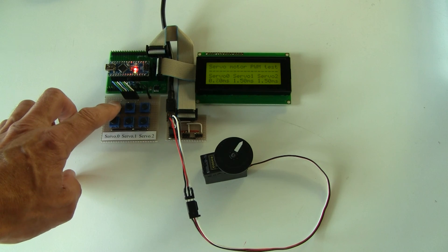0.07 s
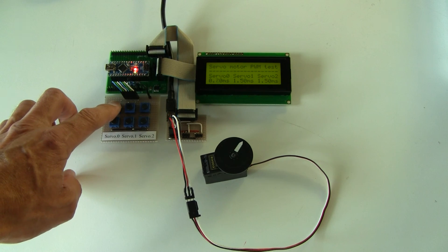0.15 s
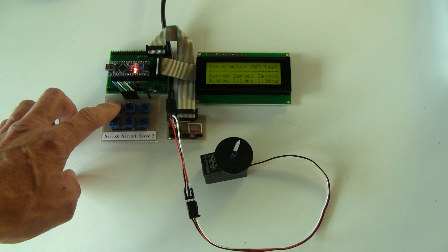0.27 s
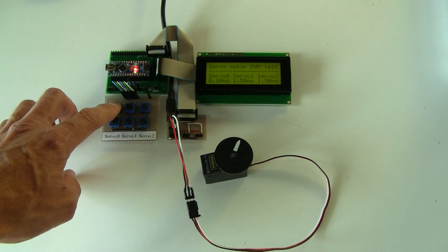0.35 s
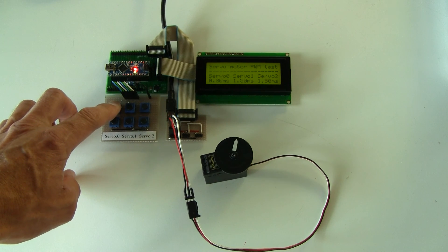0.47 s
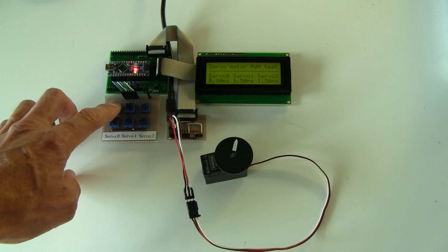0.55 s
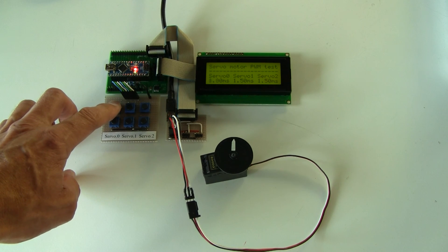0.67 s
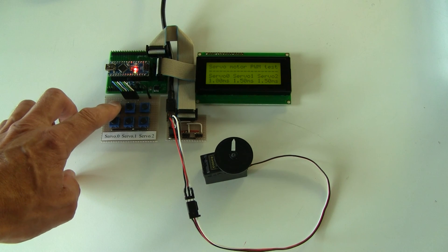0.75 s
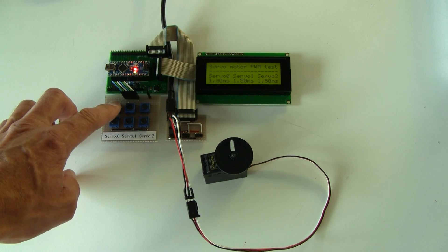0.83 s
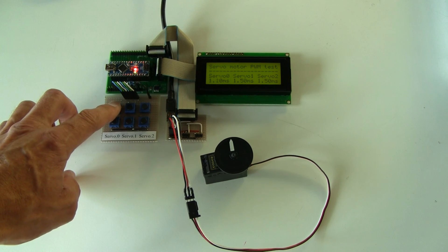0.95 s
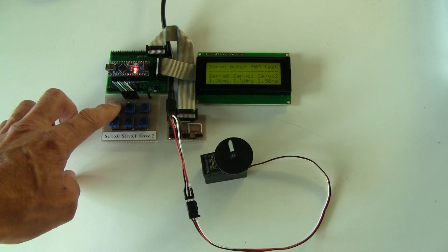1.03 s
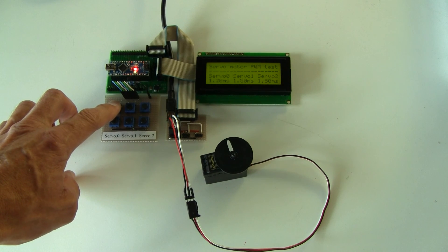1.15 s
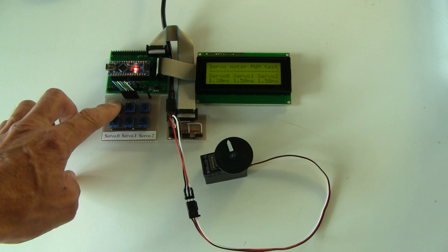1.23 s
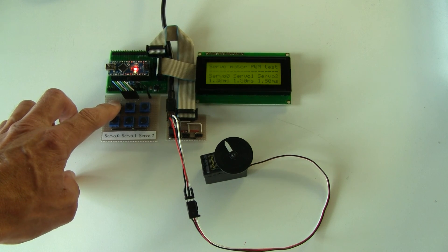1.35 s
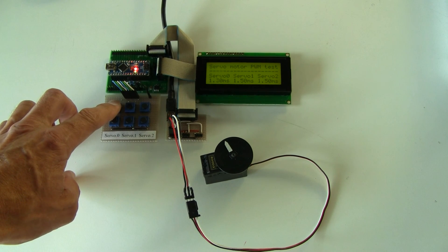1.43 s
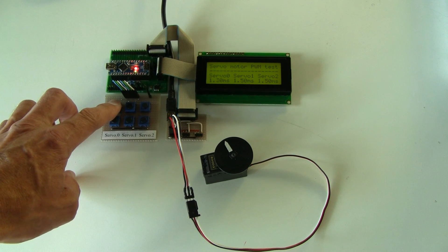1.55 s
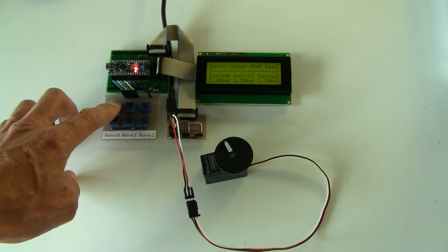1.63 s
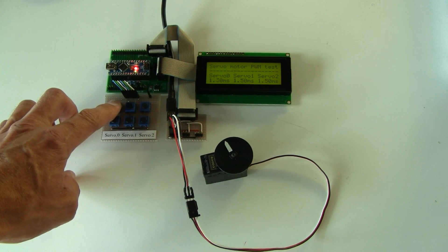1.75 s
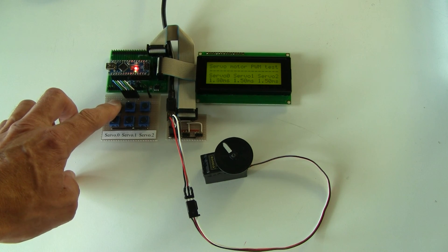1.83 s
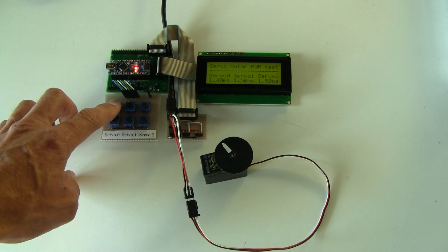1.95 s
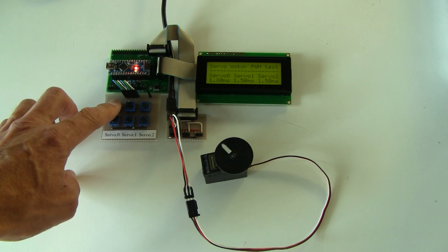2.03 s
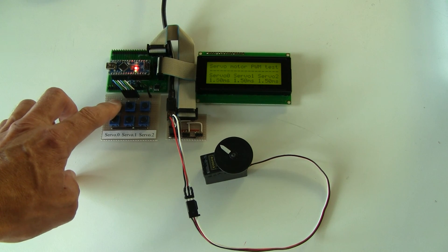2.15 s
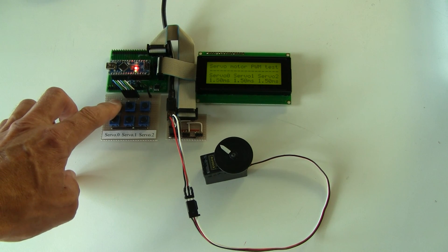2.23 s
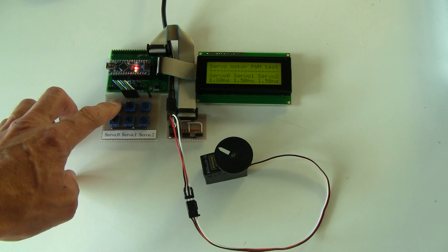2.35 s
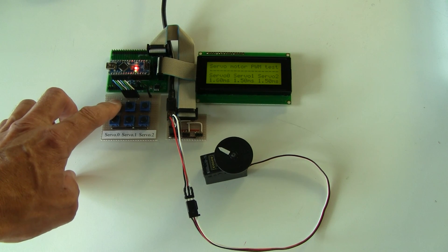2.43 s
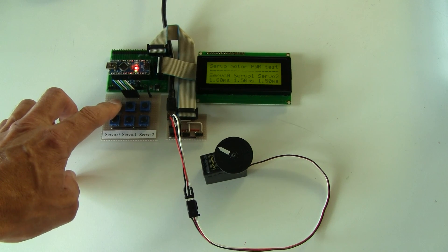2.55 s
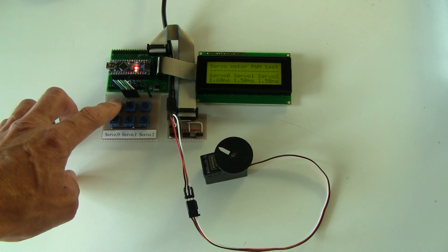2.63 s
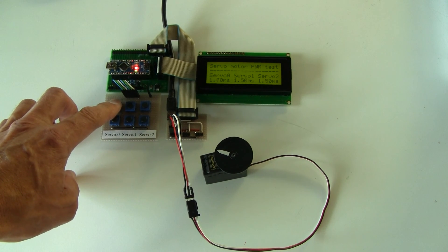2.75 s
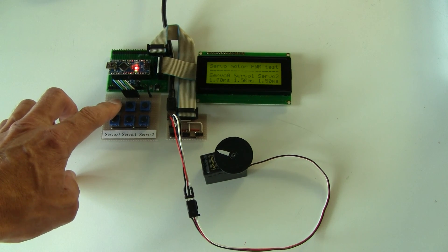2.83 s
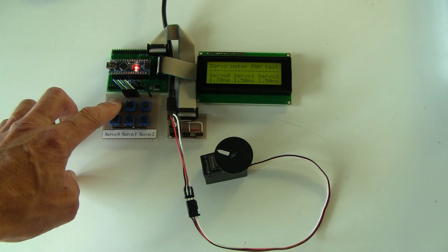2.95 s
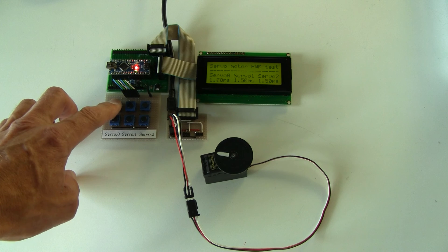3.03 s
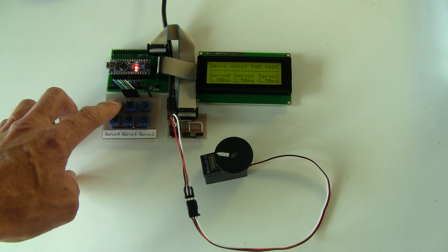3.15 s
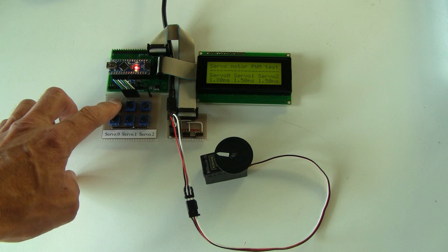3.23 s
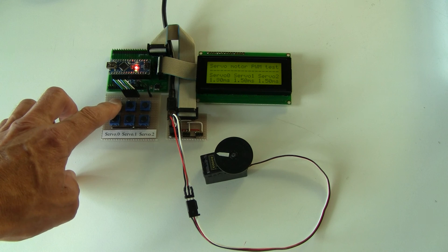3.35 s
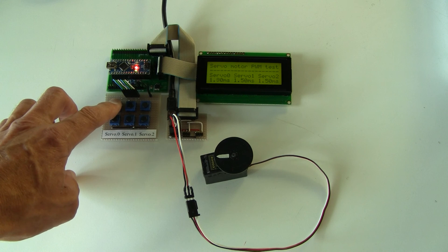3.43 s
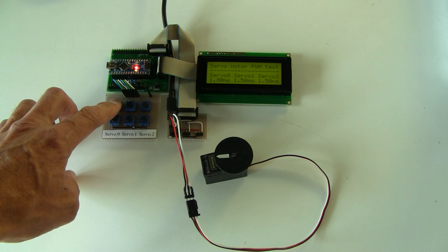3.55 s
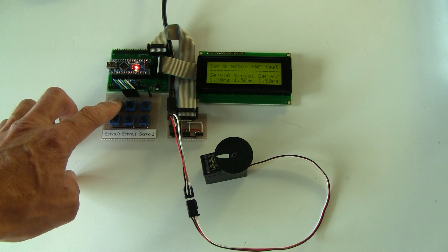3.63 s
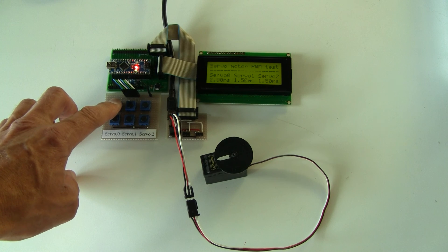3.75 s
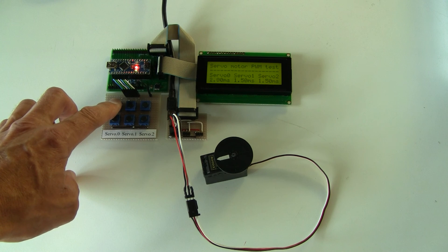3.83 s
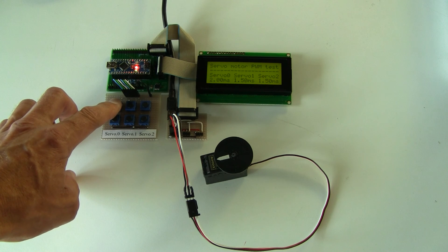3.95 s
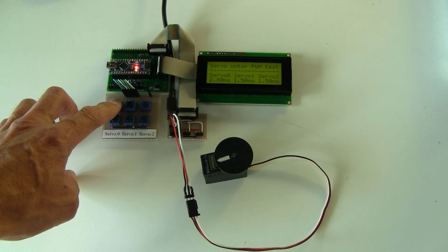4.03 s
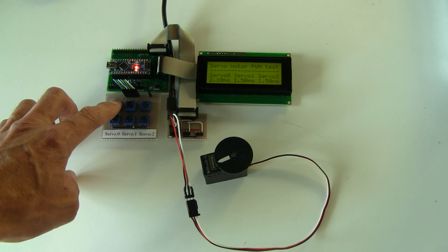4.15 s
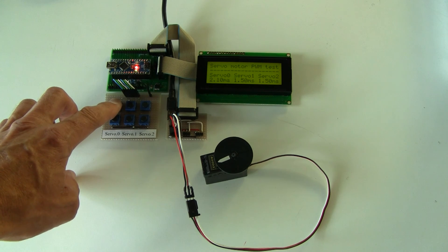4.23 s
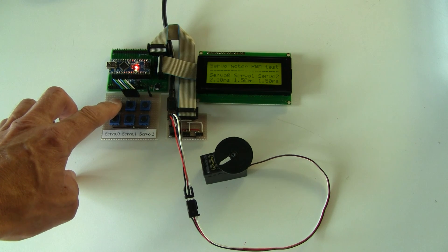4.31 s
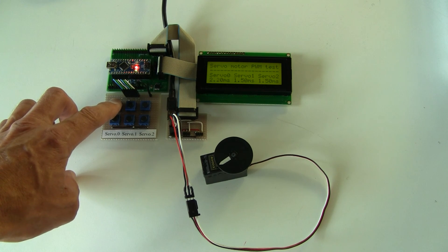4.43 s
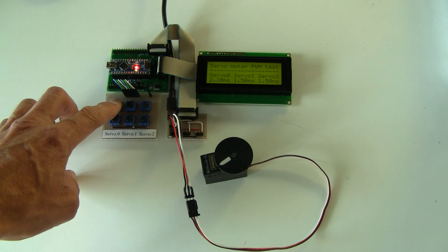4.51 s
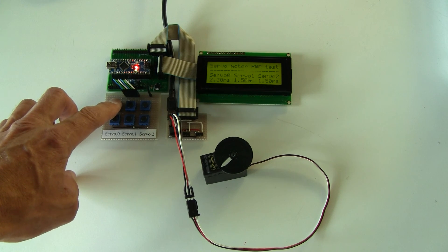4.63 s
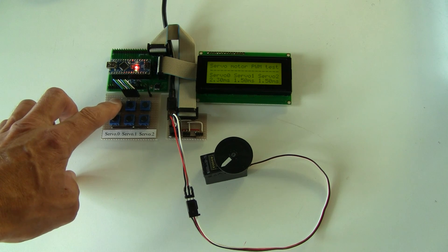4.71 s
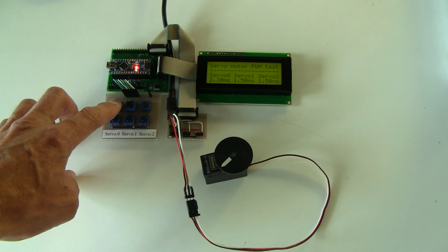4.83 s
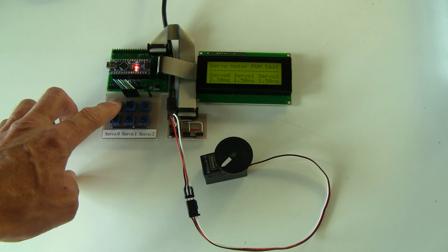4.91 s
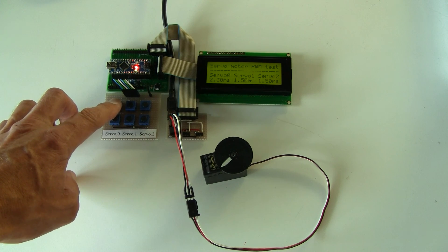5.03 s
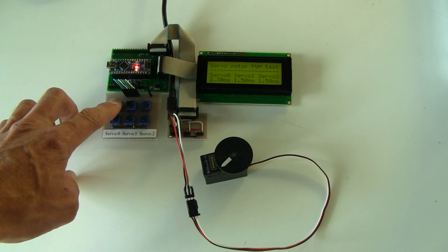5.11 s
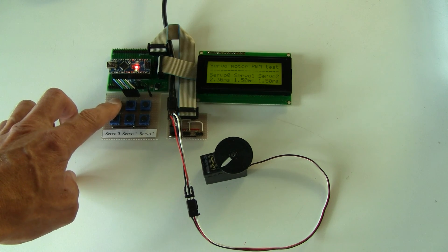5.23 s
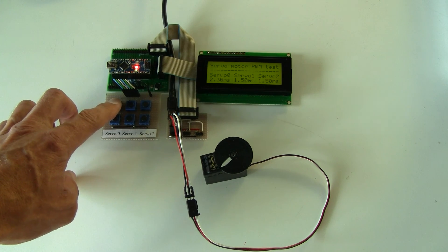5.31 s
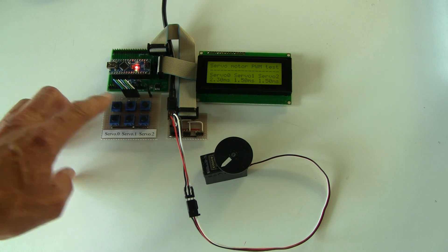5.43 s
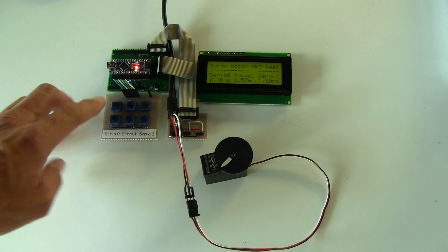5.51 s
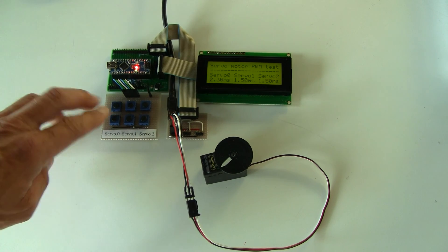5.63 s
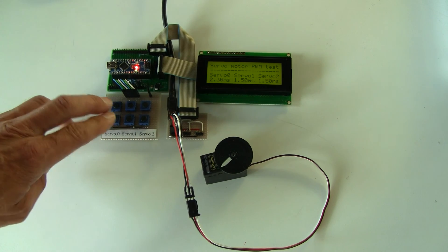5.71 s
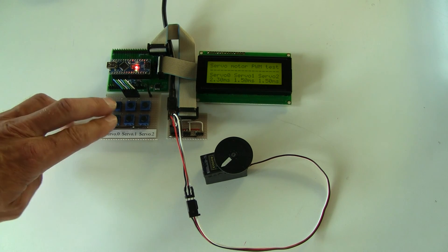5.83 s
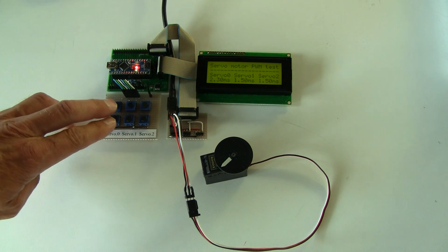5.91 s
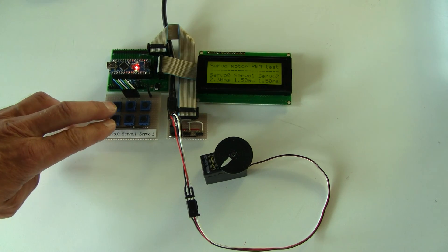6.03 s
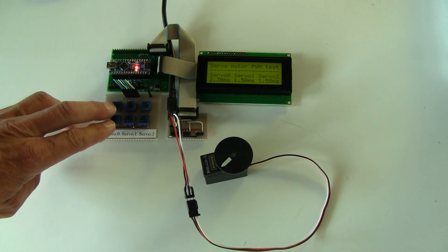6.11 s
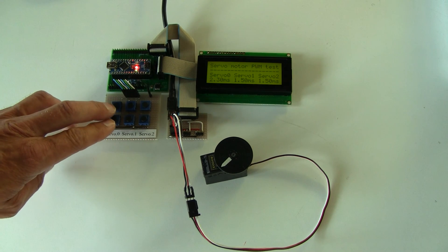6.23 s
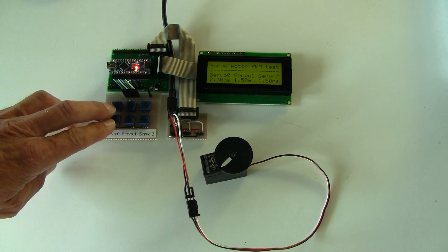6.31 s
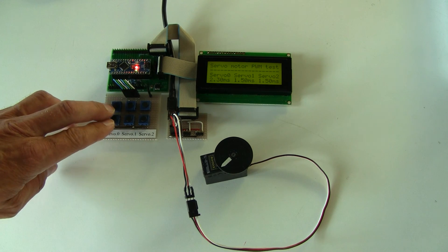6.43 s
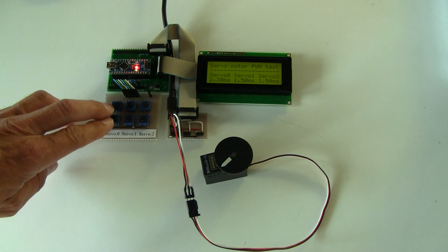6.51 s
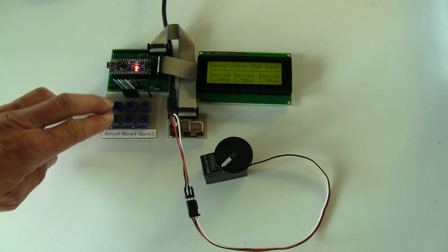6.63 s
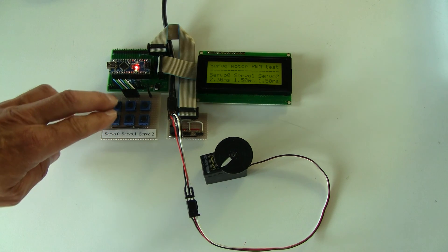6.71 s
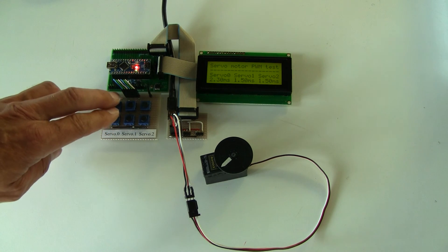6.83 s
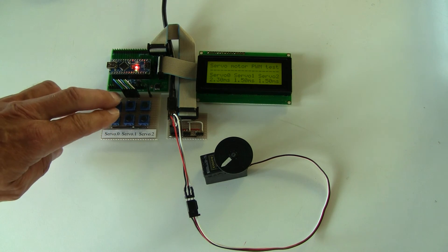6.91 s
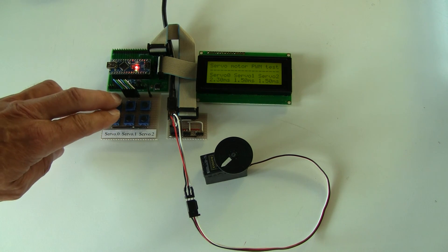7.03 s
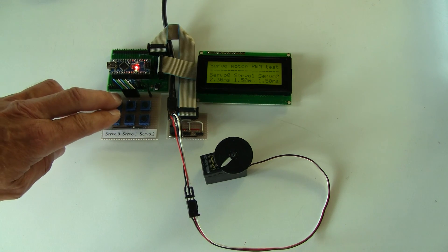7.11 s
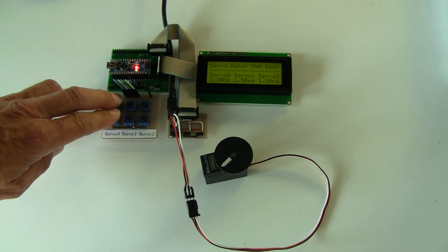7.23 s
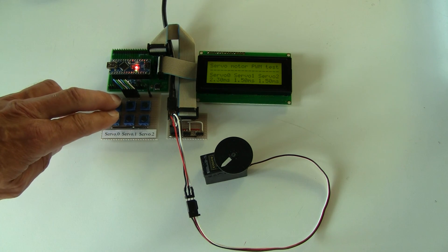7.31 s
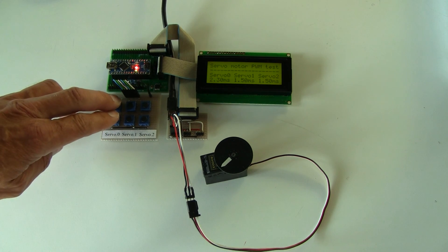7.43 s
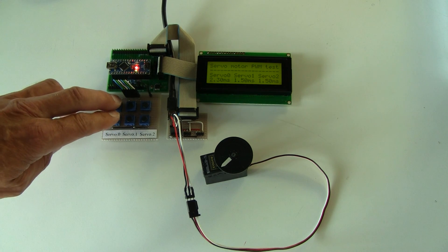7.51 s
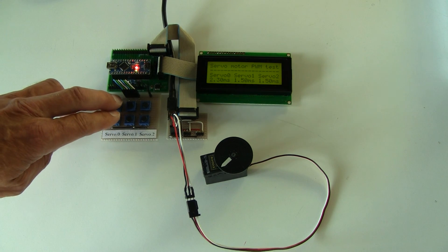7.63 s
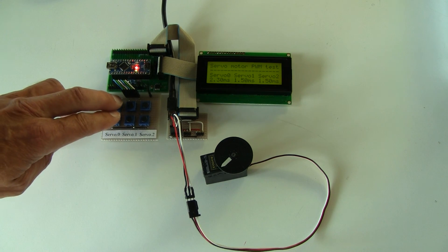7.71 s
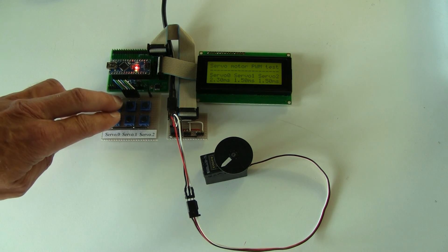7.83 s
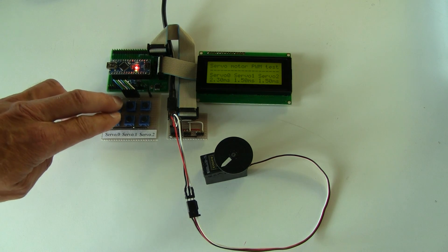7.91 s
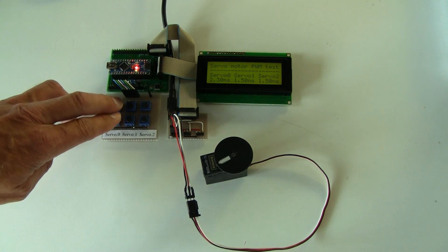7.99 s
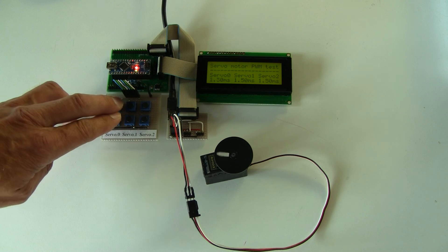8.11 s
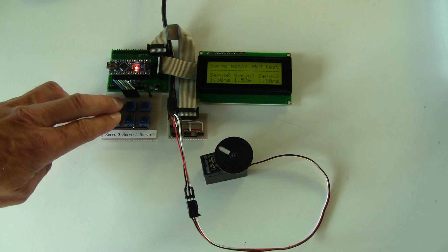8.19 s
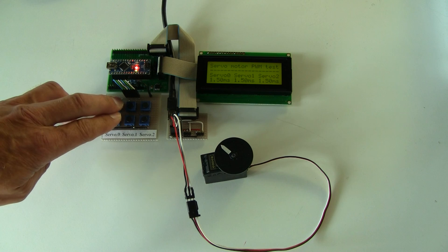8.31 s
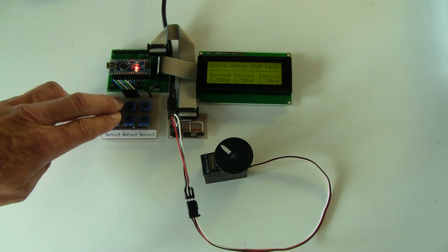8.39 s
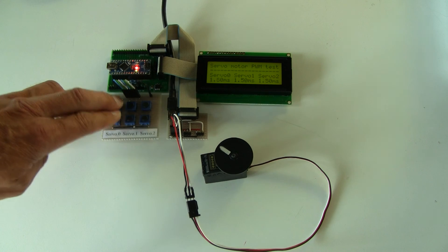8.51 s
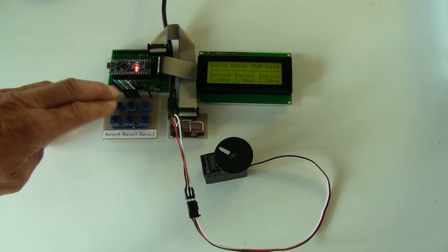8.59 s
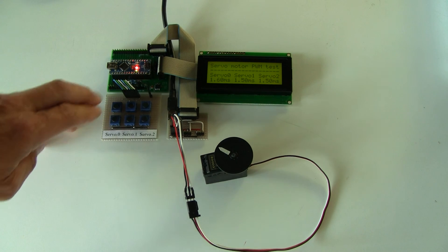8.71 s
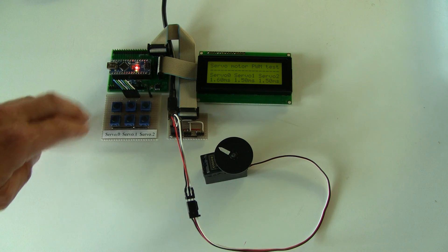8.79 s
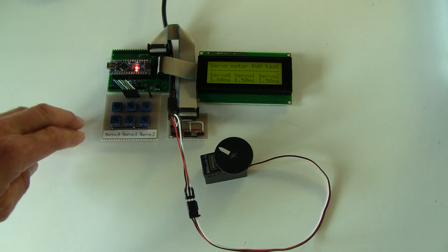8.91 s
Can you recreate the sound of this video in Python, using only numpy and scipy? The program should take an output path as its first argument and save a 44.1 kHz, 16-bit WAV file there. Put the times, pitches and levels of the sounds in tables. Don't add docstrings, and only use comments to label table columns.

```python
import sys
import numpy as np
from scipy import signal
from scipy.fft import rfft, irfft, next_fast_len
from scipy.io import wavfile
from scipy.ndimage import uniform_filter1d, map_coordinates

SR = 44100
rng = np.random.default_rng(int(sys.argv[2]) if len(sys.argv) > 2 else 0)


def natural_amplitude(level_db):
    exponent = np.asarray(level_db, float) / 20
    return 10 ** exponent


def int16_out(signal):
    q = np.round(np.clip(np.atleast_2d(signal).T, -1, 1) * 32767)
    wavfile.write(sys.argv[1], SR, q.astype(np.int16))


N = 394694


def unit(x):
    return x / np.sqrt(np.mean(x ** 2) + 1e-20)


def along(points, hz):
    point_hz, value = np.transpose(points)
    return np.interp(np.log(hz + 1), np.log(point_hz + 1), value)


def curve(points, outside=None):
    s, value = np.transpose(points)
    return np.interp(np.arange(N) / SR, s, value, outside, outside)


def wobble(rate):
    knots = rng.standard_normal(int(N * rate / SR) + 4)
    return map_coordinates(knots, [np.arange(N) * rate / SR])


def filtered(x, response):
    n = x.shape[-1]
    m = next_fast_len(n + 8192)
    return irfft(rfft(x, m) * response(np.fft.rfftfreq(m, 1 / SR)), m)[..., :n]


def resonance(f, hz, width):
    return 1j * f * width / (hz * hz - f * f + 1j * f * width)


def dying(t60, seconds):
    noise = rng.standard_normal((2, round(seconds * SR)))
    hz, t, z = signal.stft(noise, SR, nperseg=128)
    tail = signal.istft(z * natural_amplitude(-60 * t / along(t60, hz)[:, None]), SR, nperseg=128)[1]
    return tail / np.linalg.norm(tail[0])


# frequency in Hz, level in dB per Hz.
AIR_TONE = [(25, -26), (40, -32), (50, -16), (90, -11), (180, -1), (800, -9.5), (2600, -25.5), (15700, -38)]
# frequency in Hz, left-right likeness from -1 to 1.
AIR_ALIKE = [(60, 0.98), (130, 0.96), (290, 0.022), (640, -0.35), (1410, -0.12), (3100, 0.23),
             (6820, -0.026), (15000, 0.14)]
# frequency in Hz, width in Hz, level in dB on the room tone's scale.
DRONES = [(96, 6.4, -0.5), (199.9, 5.5, -0.5), (301.7, 5.6, 1.5), (592.2, 7.5, -0.5), (806, 4.5, -4.5)]


def air():
    t = np.arange(N) / SR

    def tone(f):
        drones = sum(natural_amplitude(db) * np.abs(resonance(f, hz, width)) ** 2 for hz, width, db in DRONES)
        return natural_amplitude(along(AIR_TONE, f)) + drones

    def mid_side(f):
        turn = np.arccos(np.clip(along(AIR_ALIKE, f), -1, 1)) / 2
        return tone(f) * [np.cos(turn), np.sin(turn)]

    mid, side = filtered(rng.standard_normal((2, N)), mid_side)
    mains_hz, mains_db = 120, -57
    mains = np.sqrt(2) * np.sin(2 * np.pi * mains_hz * t + 0.62 * wobble(4.8))
    mains = natural_amplitude(mains_db + 1.28 * wobble(6)) * mains
    air_db, swell_s, swell_half_s, swell_peak_db = -50, 0.77, 0.46, 2.2
    swell_db = swell_peak_db * np.exp(-((t - swell_s) / swell_half_s) ** 2)
    rumble = unit(np.array([mid + side, mid - side])) * natural_amplitude([[-.4], [.4]])
    return natural_amplitude(air_db + swell_db + 1.94) * rumble + mains


# frequency in Hz, width in Hz, level in dB.
FLANK = [(7240, 270, 11), (11000, 810, 4.5), (14800, 1500, -7)]


def switch(events, pushes, modes, snap_hz, snap_width, ring_db, clutter_db, thud_db, flank_db):
    lead = 12
    t = np.arange(SR // 16) / SR

    mode_hz = np.array(modes)[:, :1, None]
    phase = rng.uniform(0, 2 * np.pi, (len(modes), 1, 1))
    phase = phase + rng.normal(0, 1, (len(modes), 2, 1)) * mode_hz / 7000
    ring = sum(natural_amplitude(db - 60 * t / t60) * np.sin(2 * np.pi * hz * t + p)
               for (hz, db, t60), p in zip(modes, phase))
    ring = natural_amplitude(ring_db) * ring * np.clip(t / 0.000063 - .5, 0, 1)

    def arrivals(f):
        return sum(np.outer([left, right], np.exp(-2j * np.pi * f * lag)) for lag, left, right in pushes)

    def dome(f):
        tone = np.abs(resonance(f, snap_hz, snap_width)) ** 2 / (1 + (f / 15000) ** 6)
        return tone * np.exp(-2j * np.pi * f * lead / SR)

    def shade(f):
        return sum(natural_amplitude(flank_db + db) * resonance(f, hz, width) for hz, width, db in FLANK)

    clutter = natural_amplitude(clutter_db - 60 * t / 0.022) * rng.standard_normal((2, len(t)))
    clutter = clutter * (1 - np.exp(-t / 0.00021))
    snap = filtered(1. * (t == 0), lambda f: arrivals(f) * dome(f))
    snap = snap + filtered(clutter, lambda f: resonance(f, 10100, 22600) ** 3)
    snap = natural_amplitude(13.0) * snap + filtered(1. * (t == lead / SR), shade) * [[-1], [1]]

    thuds = rng.standard_normal((len(events), len(t))) * natural_amplitude(thud_db - 60 * t / 0.061)
    thuds = filtered(thuds, lambda f: resonance(f, 930, 1700) ** 2)

    out = np.zeros((2, N + SR))
    for (s, db, pan), thud in zip(events, thuds):
        level = natural_amplitude(db - 3.5 + (pan + 2.1) * np.array([[.5], [-.5]]))
        out[:, round(s * SR) - lead:][:, :len(t)] += level * (snap + ring + thud)
    return out[:, :N]


# start in seconds, level in dB, left-right balance in dB.
PRESS = [(0.00853, -9.6, -0.5), (0.2146, -10.7, -0.4), (0.41927, -11.1, -0.4), (0.62193, -10.8, -0.4),
         (0.83193, -9.9, -0.5), (1.0407, -9.9, -0.2), (1.29617, -11.0, -0.0), (1.83086, -11.5, 0.1),
         (2.04526, -11.5, 0.7), (2.30308, -10.9, -0.4), (2.6958, -11.4, -0.5), (3.03474, -11.3, 0.0),
         (3.40234, -11.2, -0.2), (3.73522, -10.6, -0.2), (4.0395, -11.1, -0.3), (4.2876, -11.1, -0.1),
         (4.53837, -10.8, -0.4), (4.8127, -10.8, -0.1), (7.97136, -10.3, 2.0), (8.03438, -12.8, 0.7)]
# delay in seconds, left gain, right gain.
PRESS_PUSHES = [(0, -0.17, -0.57), (.00021, -0.87, -0.97), (.00031, -0.42, -0.68)]
# frequency in Hz, level in dB, t60 in seconds.
PRESS_RING = [(640, -12, .03), (1203, -18, 0.12), (2040, -18, 0.04), (2850, -15, 0.03), (4500, -9, 0.01),
              (5600, -4, 0.008), (7060, -9, .02), (8000, -6, 0.018), (9560, -8, 0.006), (12800, -10, .016),
              (13900, -13, .014), (15200, -12, .014)]


def presses():
    return switch(PRESS, PRESS_PUSHES, PRESS_RING, snap_hz=7840, snap_width=8200,
                  ring_db=-17.0, clutter_db=-28, thud_db=-15.5, flank_db=4)


# start in seconds, level in dB, left-right balance in dB.
RELEASE = [(0.10499, -3.9, -1.9), (0.31052, -3.4, -1.4), (0.51463, -3.2, -1.4), (0.71705, -3.2, -2.1),
           (0.91317, -3.9, -1.6), (1.14243, -3.1, -1.2), (1.39694, -3.6, -1.5), (1.92438, -3.9, -1.4),
           (2.18451, -3.1, -1.2), (2.43737, -3.0, -1.2), (2.81764, -2.9, -1.2), (3.16701, -3.0, -1.5),
           (3.53932, -3.0, -0.9), (3.87941, -2.8, -0.8), (4.16701, -2.7, -1.3), (4.40052, -2.8, -1.1),
           (4.67791, -3.1, -1.4), (4.99166, -2.9, -1.0), (8.51812, -3.2, 1.7), (8.53413, -4.9, -0.2)]
# delay in seconds, left gain, right gain.
RELEASE_PUSHES = [(0, 1, .9), (.0002, .95, 1.15), (.00042, .4, .15)]
# frequency in Hz, level in dB, t60 in seconds.
RELEASE_RING = [(730, -15, 0.05), (1195, -18, 0.1), (2043, -21, 0.04), (2750, -12, 0.025),
                (4400, -5, 0.009), (5200, -9, 0.016), (6000, -5, 0.014), (7240, -7, .018), (8500, -3, .008),
                (11440, -12, 0.015), (12400, -8, .012), (13400, -11, .016)]


def releases():
    return switch(RELEASE, RELEASE_PUSHES, RELEASE_RING, snap_hz=7680, snap_width=5400,
                  ring_db=-20.5, clutter_db=-26.5, thud_db=-21.0, flank_db=4.5)


# frequency in Hz, t60 in seconds.
ROOM_T60 = [(300, 0.25), (2000, 0.53), (6500, 0.28), (10000, 0.29), (16000, 0.27)]
# frequency in Hz, level in dB.
ECHO_TONE = [(500, -7.5), (3500, -18.5), (5000, -7), (6300, 1), (7600, 0), (8800, -11), (12500, -13),
             (16000, -17)]


def echoes(press_db, release_db):
    sent = np.zeros(N)
    for events, wet_db in ((PRESS, press_db), (RELEASE, release_db)):
        for s, db, pan in events:
            sent[round((s + .004) * SR)] = natural_amplitude(db + wet_db)
    tail = filtered(dying(ROOM_T60, 0.46), lambda f: natural_amplitude(along(ECHO_TONE, f)))
    tail = tail + 0.55 * tail.mean(0)
    return signal.oaconvolve(sent[None], tail, axes=1)[:, :N]


def driven(press_s, frames, db, growth_db):
    frame_s, first_s, poll_s = .01999, .013, .0132
    lead_s, tail_s = .006, -0.0061
    spin_up_s, coast_s = 0.018, 0.015
    start_db, stop_db = -7.5, -30
    pulse = first_s + frame_s * np.ceil((press_s + poll_s - first_s) / frame_s)
    on = pulse - lead_s
    off = pulse + frames * frame_s + tail_s
    return [(on - .004, -90), (on, db + start_db), (on + spin_up_s, db - growth_db / 2),
            (off, db + growth_db / 2), (off + coast_s, db + stop_db), (off + coast_s + .004, -90)]


# frequency in Hz, width in Hz, dB in a step, dB in the swing.
CASE = [(1200, 380, -14, -9.5), (1990, 360, -11.5, -7.5), (3180, 820, -10.5, -12), (4620, 490, -7.5, -5.5),
        (5920, 320, 3, 0.5), (7320, 690, -2, -0.5), (9000, 4000, -9.5, -9.5), (11530, 430, -2, -1),
        (12730, 370, -8.5, -5), (15100, 320, -11, -3.5)]


def gears(level_db, turns, column, teeth_rate, scatter_db, throb, spread):
    chance, size = rng.random((2, N)), rng.standard_normal((2, N))
    sign = np.sign(np.sin(1e5 * chance))
    hits = (chance < teeth_rate / SR) * sign * natural_amplitude(scatter_db * size)
    hits = hits * (1 + throb * np.cos(2 * np.pi * turns))

    def case(f):
        return sum((-1) ** k * natural_amplitude(mode[column]) * resonance(f, mode[0], mode[1])
                   for k, mode in enumerate(CASE))

    ends = filtered(hits, lambda f: case(f) * np.array([[f < 8800], [f >= 8800]]))
    mid, side = unit(sum(end * natural_amplitude(0.92 * wobble(110) + 1.5 * wobble(14)) for end in ends))
    wide_above_hz = 5800
    side = filtered(side, lambda f: resonance(f, 1.6 * wide_above_hz, 11100)
                    / (1 + (wide_above_hz / (f + 1)) ** 6))
    return natural_amplitude(level_db) * np.array([mid + spread * side, mid - spread * side])


# gear noise in dB, growth through the step in dB.
JOGS = [(-39, 0), (-40, -2), (-39, 0), (-38, 3), (-41, -4), (-42.5, -2), (-41.5, -2), (-41, -2), (-40, -2),
        (-43, 1), (-43.5, 2), (-39, 4), (-40, -4), (-39.5, 2), (-38, -2), (-38, 0.5), (-39.5, 0)]
# time in seconds, shaft turns in Hz.
SHAFT = [
    (7.98, 150),
    (8.04, 200),
    (8.09, 223),
    (8.14, 232),
    (8.2, 233),
    (8.27, 235),
    (8.32, 232),
]
# multiple of shaft speed, level in dB.
WHINE = [(9, -66), (30, -63), (49, -59), (50, -56), (51, -62), (57, -65), (63, -59), (66, -63), (69, -61)]


def servo():
    jogs = [driven(press[0], 3, *jog) for press, jog in zip(PRESS, JOGS)]
    step_turns = np.cumsum(130 + 30 * wobble(18)) / SR
    steps = gears(curve(np.concatenate(jogs)), step_turns, column=2, teeth_rate=13000,
                  scatter_db=4, throb=.3, spread=0.7)

    swing_db = curve(driven(PRESS[-2][0], frames=16, db=-42.5, growth_db=-3.3), -120)
    shaft_hz = curve(SHAFT)
    turns = np.cumsum(shaft_hz) / SR
    swing = gears(swing_db - 0.5, turns, column=3, teeth_rate=14000,
                  scatter_db=1.5, throb=0.21, spread=0.71)

    on = swing_db > -100
    at_speed = np.clip((shaft_hz - 205) / 25, 0, 1) * natural_amplitude(swing_db + 47.5)
    for order, db in WHINE:
        level = at_speed[on] * natural_amplitude(db + 2.5 * wobble(28)[on])
        swing[:, on] += level * np.sin(2 * np.pi * order * turns[on])
    return steps + swing


# start in seconds, peak in dB, loudest region in Hz, hardness from 0 to 1.
KNOCKS = [(5.4055, -32.5, 800, 0), (5.4485, -15.5, 1200, 0.86), (7.2245, -28.5, 750, 0.17),
          (7.243, -32, 1360, 0.35), (7.404, -47, 1000, 0.2), (7.523, -43, 1820, 0.4),
          (7.756, -37, 1870, 0.54), (8.5622, -18, 695, 0.1), (8.5975, -19.5, 900, 0.03),
          (8.6188, -14.5, 1430, 1), (8.635, -21, 990, 0.86), (8.657, -26.5, 1730, 1),
          (8.703, -37.5, 800, 0.16)]
# frequency in Hz, width in Hz, level in dB.
TABLE_MODES = [(598.5, 48, 1.5), (674, 34.5, 5.5), (855, 49, -1.5), (900, 10, -1), (929, 42, -2),
               (1197, 27, 4), (1430, 42, -3), (1697, 31, 2.5), (1973, 43, -5.5), (2566, 73, 0.5),
               (2840, 340, -6), (3660, 180, -11), (4020, 440, -9), (5000, 330, -0.5)]
# frequency in Hz, t60 in seconds.
PANEL_T60 = [(600, 0.26), (1500, 0.24), (3000, 0.2), (8000, .04)]


def knocks():
    out, t = np.zeros((2, N + SR)), np.arange(round(.3 * SR)) / SR
    # slap in dB, contact t60 in seconds, dull above Hz
    soft, hard = (-32, 0.032, 1120), (-7.5, 0.047, 4700)

    def panel_tone(f):
        modes = sum((-1) ** k * natural_amplitude(db) * resonance(f, hz, width)
                    for k, (hz, width, db) in enumerate(TABLE_MODES))
        return modes + .5 * resonance(f, 1415, 2180) ** 2

    for s, db, spot_hz, hardness in KNOCKS:
        slap_db, contact_t60, dull_hz = np.add(soft, np.clip(hardness, 0, 1.2) * np.subtract(hard, soft))

        def spot(f):
            return (0.5 + resonance(f, spot_hz, 1350)) / (1 + 1j * f / dull_hz) ** 3

        shake = dying(PANEL_T60, .3)[:, :len(t)]
        shake = shake * (natural_amplitude(-60 * t / contact_t60) + natural_amplitude(-14)) * np.tanh(t / .0006)
        mid, side = filtered(shake, lambda f: spot(f) * panel_tone(f))
        panel = (mid + 0.083 * side * [[1], [-1]]) / np.abs(mid).max()
        slap = rng.standard_normal((2, len(t))) * natural_amplitude(slap_db - 60 * t / 0.042)
        slap = filtered(slap, lambda f: resonance(f, 7500, 4700))
        out[:, round(s * SR):][:, :len(t)] += natural_amplitude(db) * (panel + slap * np.tanh(t / 0.00056))
    return out[:, :N]


# start in seconds, peak level in dB, frequency in Hz.
TICKS = [
    (5.4305, -27, 9000),
    (5.9643, -35, 4000),
    (8.0, -38, 11000),
    (8.6, -38, 11000),
]


def ticks():
    out, t = np.zeros((2, N + SR)), np.arange(round(.3 * SR)) / SR
    for s, db, hz in TICKS:
        ping = natural_amplitude(db - 60 * t * hz / 6) * np.sin(2 * np.pi * hz * t)
        out[:, round(s * SR):][:, :len(t)] += ping
    return out[:, :N]


def finger_rub():
    s, rise, hold, fall, db = 8.538, .008, .056, .01, -45
    skin = unit(filtered(rng.standard_normal((2, N)), lambda f: resonance(f, 7000, 8000) ** 2))
    slide_db = curve([(s, db - 20), (s + rise, db + 1), (s + rise + hold, db - 2),
                      (s + rise + hold + fall, db - 24)], -120)
    return natural_amplitude(slide_db + 1.3 * wobble(370)) * skin


def hand_thump():
    s, db, hz, t60 = 8.588, -41, 285, 0.56
    t = np.arange(round(.3 * SR)) / SR
    out = np.zeros((2, N))
    thump = natural_amplitude(db - 60 * t / t60) * np.tanh(t / 0.0042) * np.sin(2 * np.pi * hz * t)
    start = round(s * SR)
    out[:, start:start + len(t)] += thump[:N - start]
    return out


# frequency in Hz, level in dB.
ROOM_TONE = [(500, 7), (1800, -1.5), (3000, -1), (4400, 1), (6000, -5), (7900, -4), (9200, -4),
             (16000, -10)]


def room(x, wet_db):
    tail = filtered(dying(ROOM_T60, .4), lambda f: natural_amplitude(along(ROOM_TONE, f)))
    late = np.pad(x.mean(0), (300, 0))
    return x + natural_amplitude(wet_db) * signal.oaconvolve(late[None], tail, axes=1)[:, :N]


def scene():
    clicks = presses() + releases() + echoes(press_db=-8.5, release_db=-4)
    moves = servo() + knocks() + ticks() + finger_rub() + hand_thump()
    return air() + clicks + room(moves, wet_db=-11.5)


def low_pass(x):
    return signal.sosfilt(signal.butter(12, 15700, fs=SR, output="sos"), x)


def record(dry):
    steady_top_hz = 15750
    top = filtered(dry, lambda f: np.clip((f - steady_top_hz) / 200 + .5, 0, 1))
    sharp = uniform_filter1d(np.abs(top).max(0), size=128) > natural_amplitude(-64)
    mix = dry - top * (1 - uniform_filter1d(1. * sharp, size=64))
    return low_pass(mix)


dry = scene()
out = record(dry)
int16_out(out)
```